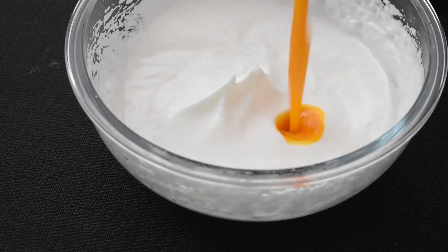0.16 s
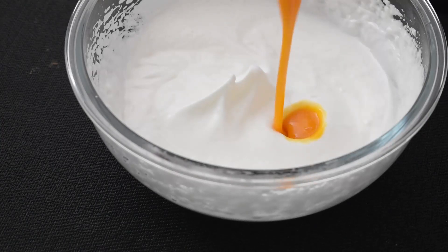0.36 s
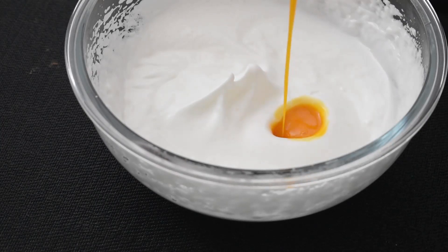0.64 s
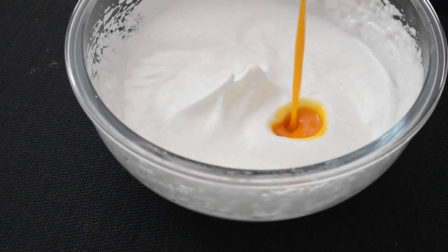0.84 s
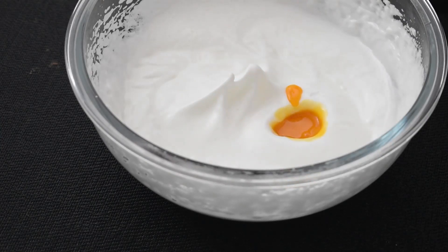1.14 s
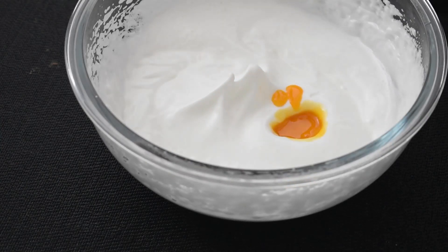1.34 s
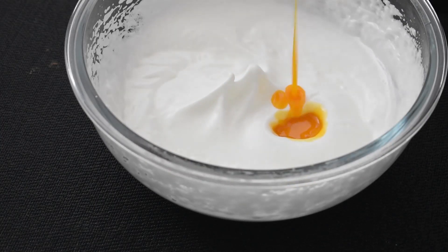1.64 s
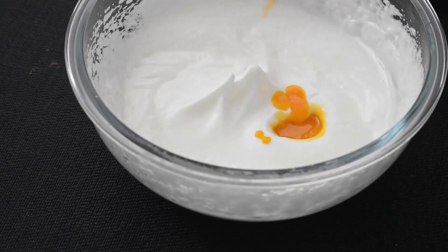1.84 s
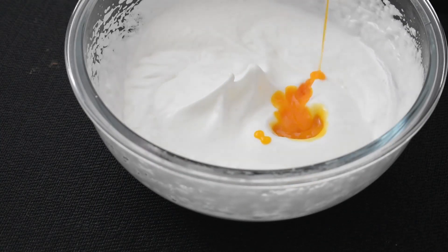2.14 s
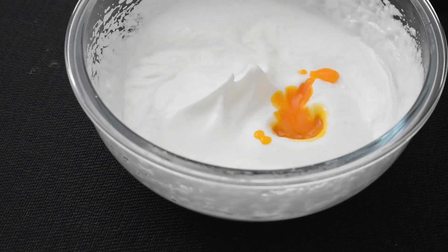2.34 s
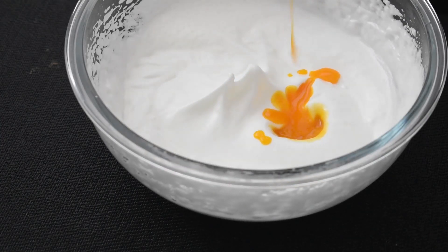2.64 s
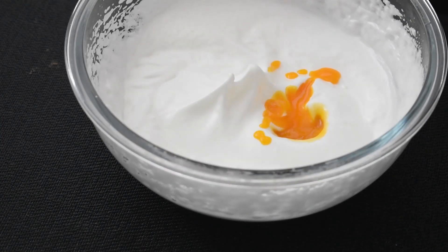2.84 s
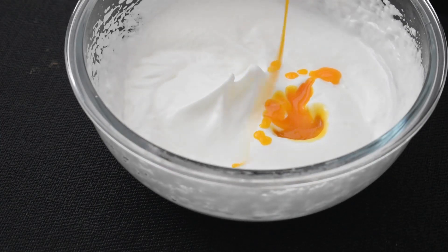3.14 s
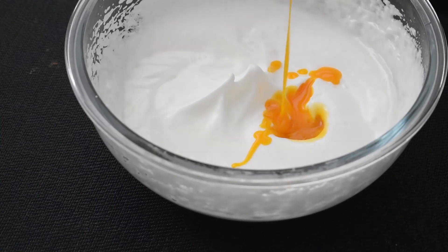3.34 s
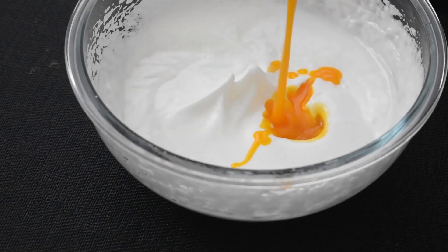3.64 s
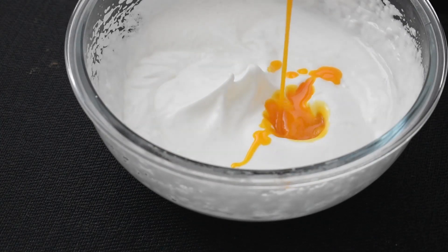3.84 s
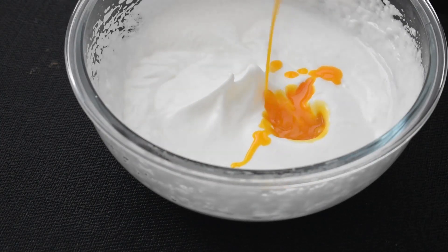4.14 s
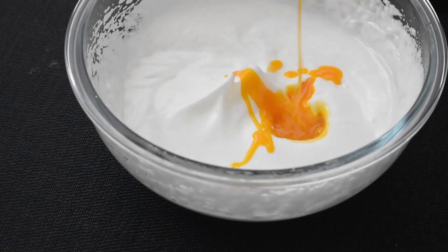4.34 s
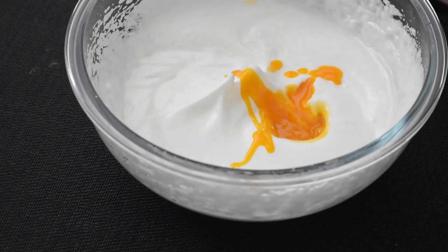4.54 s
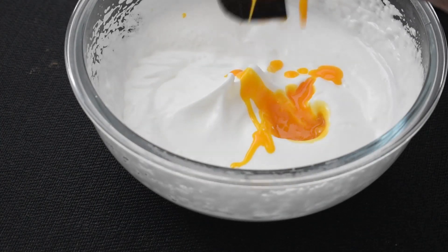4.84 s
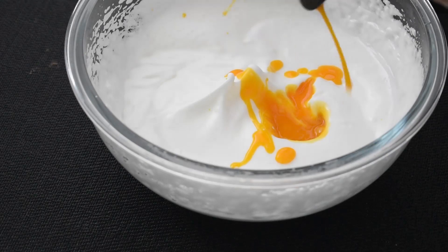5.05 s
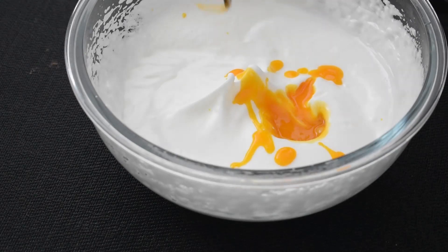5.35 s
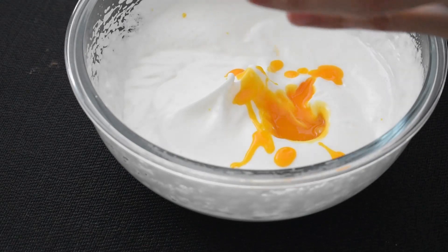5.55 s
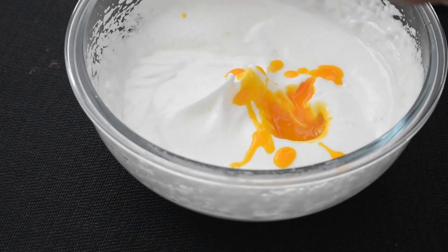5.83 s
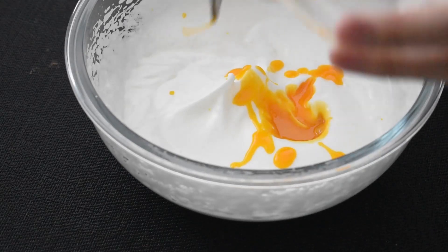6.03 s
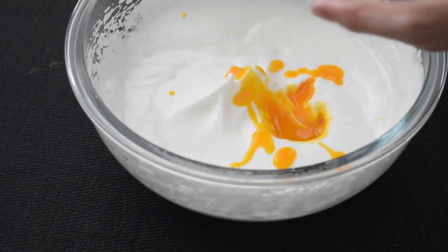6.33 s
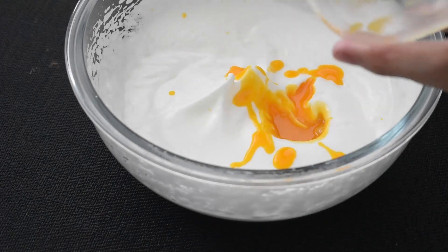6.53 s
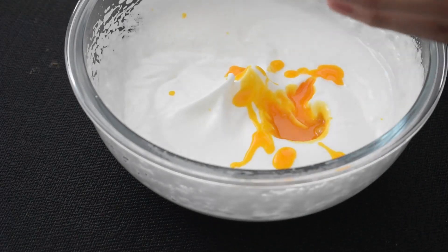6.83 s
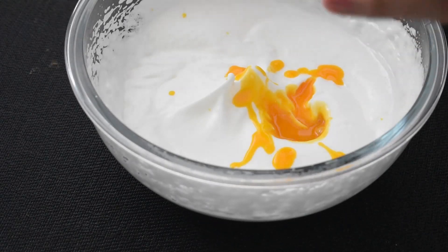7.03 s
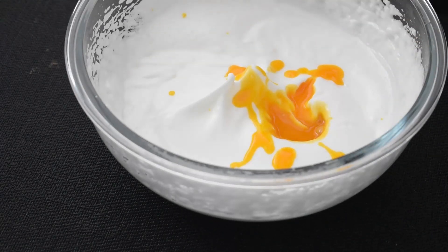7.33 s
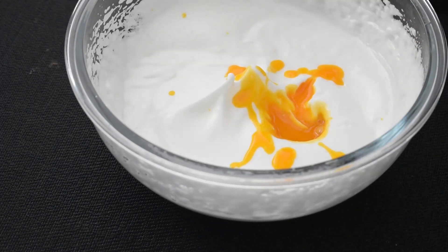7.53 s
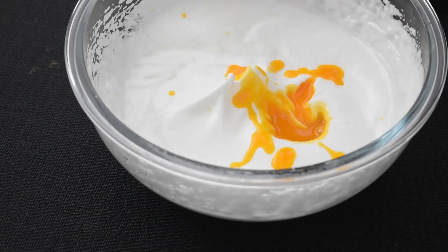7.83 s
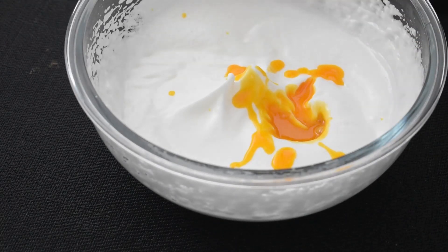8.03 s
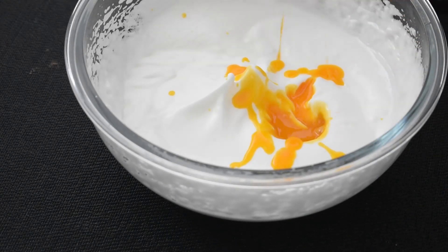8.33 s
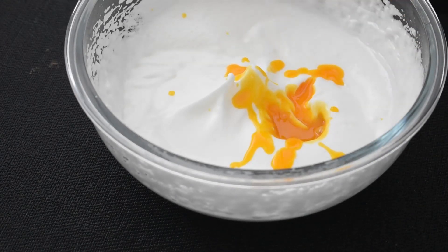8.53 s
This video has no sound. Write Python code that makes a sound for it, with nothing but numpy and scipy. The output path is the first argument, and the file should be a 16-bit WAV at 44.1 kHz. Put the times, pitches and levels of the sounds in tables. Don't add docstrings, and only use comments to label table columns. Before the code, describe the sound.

A spoon scrapes egg yolk from a small glass dish in a quiet kitchen, taps sharply on its rim, then the dish is set down.

```python
import sys
import numpy as np
from scipy import signal
from scipy.io import wavfile
from scipy.ndimage import uniform_filter1d

SR = 44100
rng = np.random.default_rng(int(sys.argv[2]) if len(sys.argv) > 2 else 0)


def invert_db(x):
    u = np.asarray(x, float) / 20
    return 10 ** u


def store_pcm(level_fs):
    pcm = np.round(np.clip(level_fs, -1, 1) * 32767).astype(np.int16)
    wavfile.write(sys.argv[1], SR, np.atleast_2d(pcm).T)


N = 382788

# f/Hz, level/dB, unsteadiness/0-1
HUM = [(60, -65.5, .4), (120, -63.5, .5)]
# f/Hz, density/dB per Hz
FLOOR = [(8.8, -23.5), (15, 7), (33, -14.5), (62, -13.5), (240, -21.5), (748, -29.5), (2780, -36.5),
         (15500, -40)]
# f/Hz, level/dB
APART = [(60, -27), (110, -21), (200, -17.5), (700, -13), (2380, -8), (4400, -5.5), (15000, -2.5)]
# t/s, level/dB
STIR = [(0.0, -57), (5.2, -56.5), (7.3, -57.5), (8.68, -58)]
# f/Hz, t60/s
ROOM = [(250, 0.4), (550, 0.27), (1000, 0.42), (3000, 0.39), (5000, 0.43), (10000, 0.44), (15000, 0.21)]
# delay/s, level/dB
WALLS = [(.005, -14.5), (.027, -18.5), (.036, -15), (.06, -17.5)]

# peak t/s, rise/s, fall/s, level/dB, worktop note f/Hz
BUMPS = [
    (.096, 0.028, 0.064, -49, 218),
    (.18, 0.023, .13, -46, 205),
    (.17, .02, .06, -53, 310),
    (.6, 0.051, .2, -55, 208),
    (1.99, 0.037, .12, -49, 214),
    (3.8, .3, 0.072, -55, 333),
    (4.27, .03, 0.058, -51, 306),
    (4.306, .03, .1, -48, 212),
    (5.28, .04, 0.079, -44.5, 212),
]
# peak t/s, rise/s, fall/s, level/dB
SLIDES = [
    (1.37, .2, .06, -64),
    (1.54, 0.023, 0.44, -59.5),
    (1.97, 0.15, 0.035, -62),
    (2.59, 0.15, 0.073, -55.5),
    (2.934, .006, 0.072, -53),
    (5.926, .08, .04, -59),
    (5.994, .03, .025, -63),
    (7.192, .006, 0.051, -56.5),
]
# peak t/s, rise/s, fall/s, level/dB
RATTLES = [
    (4.157, 0.023, .004, -41),
    (4.503, 0.014, 0.0049, -42),
    (5.72, .2, .15, -64.5),
    (5.93, .05, .05, -61),
    (6.518, .005, 0.054, -50),
]
# t/s, peak level/dB, centre f/Hz
TICKS = [
    (0.156, -47, 8550),
    (0.5606, -37, 8700),
    (3.7993, -41, 12700),
]
# t/s, peak level/dB, body f/Hz, brightness/dB, room share/dB
KNOCKS = [(0.634, -44, 810, -17, -9), (1.891, -45.5, 397, -11, -2.5), (2.208, -53, 1150, -13, -13),
          (2.454, -39, 397, -18, -7), (2.619, -45, 864, -15, -20), (2.708, -57, 476, 4, -3),
          (3.112, -28.5, 417, -12, -6.5), (3.826, -41, 615, -12, -7), (4.05, -49, 950, 1.5, -5),
          (4.296, -56, 1130, -10, -37), (4.384, -41, 686, -25, -10.5), (4.76, -39, 430, -19, -18.5),
          (5.147, -39.5, 560, -16, -10), (5.261, -46, 474, -12.5, -16), (5.62, -42, 688, -21, -4.5),
          (6.805, -35.5, 616, -11, -7.5)]

# t/s, upper-mode peak/dB, low modes/dB, top modes/dB, room
# share/dB
TAPS = [
    (4.1661, -25, 3, -6, -4.5),
    (4.5058, -23.5, 3.5, 1, -6),
    (4.5107, -16, 1, -8.5, -6),
    (5.7368, -52.5, 3, -12, 2),
    (6.8281, -45.5, 3, -3, 2),
    (6.8684, -30.5, 2.5, 1, -6),
        (4.1598, -28, 5.5, -2.5, -8.5),
    (4.81, -54.5, -3.5, 2.5, -9.5),
]
HELD_TAPS = [
    (0.087, -48.5, 1.5, -12, -10),
    (0.1314, -60, 0, 9, -6),
    (0.5651, -42.5, 4.5, 5, -9.5),
    (2.1316, -54, -3, 1, -2),
    (2.5885, -55, 5, -3, -8),
    (2.7736, -48, -4, -12, -10),
    (2.9154, -47, -1, 3.5, -6),
    (4.2894, -49, 7.5, -8, -9),
    (7.1452, -46, -0.5, -5, 1),
    (7.1683, -44.5, -14, 6, -5),
]
CLINKS = [
    (3.0824, -55.5, 10, -3, 2),
    (3.6549, -42.5, 5.5, -6, -7.5),
    (5.6213, -55, 1.5, -12, 0),
    (5.9174, -69, -3, -3, -12),
    (6.8064, -40.5, -9, -13, 2.5),
]
DIGS = [
    (1.487, -44.5, -2.5, -1, 0),
    (1.8855, -49, 4.5, 3, -4),
    (1.9785, -49.5, -2, -7, -4),
    (2.455, -46, 7.5, -12, -5),
    (2.82, -31.5, -1, 0.5, -4),
    (3.1118, -30, -3, -5, -5.5),
]

# f/Hz, level/dB, t60/s
DISH_LOW = [(390, -8.5, .025), (795, -1.5, 0.01), (910, -0.5, 0.019), (1130, 5.5, 0.014), (1440, 1, 0.012),
            (1810, -9, 0.0101), (2320, -6, 0.0033), (1122, -23, .27)]
DISH_UPPER = [(2965, -2, 0.02), (3293, 1.5, 0.0098), (3695, -3, 0.00855), (3297, -16.5, 0.22)]
DISH_TOP = [(4542, -4.5, 0.017), (4748, -5, 0.022), (5220, -12.5, .01), (6000, -12, 0.0058)]
# f/Hz, level/dB, t60/s
EDGE = [(7100, 4, 0.0032), (8006, -0.5, 0.0028), (10620, 0, 0.0031), (13070, -4, 0.0062)]
# f/Hz, level/dB, t60/s
SPOON_LOW = [(1950, -5, 0.017), (2220, -0.5, 0.0068), (1130, -9.5, 0.013), (1950, -24, 0.11)]
SPOON_UPPER = [(2830, 10, .01), (3240, 16, 0.02), (3750, -12, 0.0073), (3230, -38, 0.3)]
# f/Hz, level/dB, t60/s
DIG_LOW = [(416, -3.5, 0.024), (994, 1.5, 0.0079), (1315, 6.5, 0.011), (1690, -6, 0.029)]
DIG_UPPER = [(2470, -0.5, 0.0081), (2870, -2, 0.011), (3310, -2, 0.0051)]
DIG_TOP = [(4450, -4, .006), (4850, -3, .007), (5250, -3, .006)]
# f/Hz, width/Hz, level/dB
DISH_FAR = [
    [(560, 400, -12.5), (1110, 170, -3), (1300, 550, -10.5), (1935, 180, -17)],
    [(3270, 350, -2.5), (3330, 900, -12), (2750, 3000, -18)],
    [(4780, 820, -7), (6500, 3500, -26)],
]
DIG_FAR = [
    [(440, 250, -5), (800, 220, -5), (1300, 530, -2)],
    [(3020, 2400, -8.5)],
    [(4950, 700, -2.5), (7000, 2000, -19)],
]

# t/s, peak level/dB, room share/dB
SET_DOWN = (6.343, -3.16, -6.5)
# f/Hz, width/Hz, level/dB
SET_DOWN_MODES = [(658, 100, 3.5), (977, 380, 6), (1470, 21, -3), (1880, 250, -11), (2790, 260, -5),
                  (4000, 68, -19), (4540, 350, -20), (6760, 100, -32), (8150, 83, -34)]
SET_DOWN_FAR = [(377, 230, -18), (620, 330, -3.5), (1090, 360, -0.1), (1870, 460, -13.5), (2830, 1000, -12),
                (5000, 1100, -26)]
# t/s, peak level/dB, room share/dB
CRACK = (4.8471, 2.5, -6.5)
# f/Hz, width/Hz, level/dB
CRACK_MODES = [(840, 140, -17), (1132, 200, -15), (1475, 200, -18), (3250, 300, -12), (3613, 300, -4.5),
               (4746, 330, 0.8), (6580, 260, -14), (8070, 310, -17), (8950, 120, -26), (10170, 420, -22),
               (10530, 600, -13.5), (11020, 300, -27.5), (12150, 590, -25.5)]
CRACK_FAR = [(600, 540, -26.5), (1106, 88, -6.5), (1295, 310, -13.5), (2000, 900, -30), (3250, 550, -4.5),
             (3888, 840, -10), (4830, 950, -2.5), (7408, 6030, -21.5)]


def evened(x):
    return x / np.sqrt(np.mean(x ** 2) + 1e-20)


def read(points, hz):
    f, value = np.transpose(points)
    return np.interp(np.log(hz + 1), np.log(f + 1), value)


def add(mix, start_s, sound):
    part = mix[round(start_s * SR):][:len(sound)]
    part += sound[:len(part)]


def band(x, lo_hz, hi_hz):
    return signal.sosfilt(signal.butter(2, [lo_hz, hi_hz], "band", fs=SR, output="sos"), x)


def hum():
    t = np.arange(N) / SR
    wander = evened(band(rng.standard_normal((len(HUM), N)), 0.22, 4.4))
    out = np.zeros(N)
    for (hz, db, unsteady), w in zip(HUM, wander):
        out += invert_db(db) * (1 + unsteady * w) * np.sin(2 * np.pi * hz * t) * np.sqrt(2)
    return out


def floor():
    frames, hz = N // 512 + 6, np.fft.rfftfreq(2048, 1 / SR)
    a, b, c, d, patches = rng.standard_normal((frames, 1025, 5)).T
    patches = uniform_filter1d(patches, 14, 0)
    patches = evened(uniform_filter1d(patches, 8, 1))
    s, air_db = np.transpose(STIR)
    stir_db = np.interp(np.arange(frames) * 512 / SR, s, air_db - air_db[-1])
    stirred = 1 / (1 + (hz[:, None] / 2400) ** 2)
    mid_db = read(FLOOR, hz)[:, None] + 0.78 * patches + 1.1 * stirred * stir_db
    side_db = (read(FLOOR, hz) + read(APART, hz))[:, None]
    mid = (a + 1j * b) * invert_db(mid_db)
    side = (c + 1j * d) * invert_db(side_db)
    air = signal.istft(np.array([mid + side, mid - side]), nperseg=2048, noverlap=1536)[1][:, :N]
    return invert_db(-49) * evened(air)


def kitchen(x):
    hz, t, z = signal.stft(rng.standard_normal(SR), SR, nperseg=256)
    decay = invert_db(-60 * t / read(ROOM, hz)[:, None])
    tail = signal.istft(z * decay, SR, nperseg=256)[1][:SR]
    t = np.arange(SR) / SR
    tail = tail * (1 - np.exp(-(t / 0.011) ** 2))
    tail = tail / np.linalg.norm(tail)
    for delay_s, db in WALLS:
        scatter = rng.standard_normal(400) * np.exp(-t[:400] / 0.002)
        add(tail, delay_s, invert_db(db) * scatter / np.linalg.norm(scatter))
    return signal.fftconvolve(x, tail)[:N]


def stroke(peak_s, rise_s, fall_s, db):
    t = np.arange(-rise_s, fall_s, 1 / SR)
    sunk = np.where(t < 0, -t / rise_s, t / fall_s)
    drop_db = 18
    return peak_s - rise_s, invert_db(db - drop_db * sunk) * np.minimum(8 * (1 - sunk), 1)


def bumps():
    shiver = evened(band(rng.standard_normal((2, N)), 2.4, 40))
    quarter_turn = np.array([[0], [1 / 4]])
    out = np.zeros(N)
    for *shape, hz in BUMPS:
        start_s, swell = stroke(*shape)
        at = round(start_s * SR) + np.arange(len(swell))
        tones = np.cos(2 * np.pi * (hz * at / SR + quarter_turn))
        murmur = ((0.68 + 0.39 * shiver[:, at]) * tones).sum(0)
        add(out, start_s, swell * murmur)
    return invert_db(-2.5) * out


def ring(modes, stray, rise_s=0.00047, chatter_s=0.00059):
    t = np.arange(SR // 3) / SR
    hz, db, t60 = np.transpose(modes)[:, :, None]
    luck = rng.uniform(-1.1, 1, (len(modes), 2))
    hz = hz * (1 + stray * luck[:, :1] * (t60 < 0.1))
    level = invert_db(db + 60 * stray * luck[:, 1:] - 60 * t / t60)
    x = (level * np.sin(2 * np.pi * hz * t)).sum(0)
    contact = 0.22 * rng.standard_normal(256) * np.exp(-t[:256] / chatter_s)
    contact[0] = 1
    x = signal.oaconvolve(x * (1 - np.exp(-t / rise_s)), contact)
    return x / abs(x).max()


def slips(rows, body):
    size = invert_db(4.6 * np.minimum(rng.exponential(1, N), 5)) * rng.choice([-1, 1], N)
    slipped = rng.random(N) < 900 / SR
    pressure = np.zeros(N)
    for row in rows:
        add(pressure, *stroke(*row))
    return evened(signal.oaconvolve(size * slipped, body)[:N]) * pressure


def slides():
    edge = ring(DIG_TOP, 0) + invert_db(3.5) * ring(DIG_UPPER, 0) + invert_db(-7.5) * ring(DIG_LOW, 0)
    dish = ring(DISH_UPPER, 0) + invert_db(-2) * ring(DISH_TOP, 0) + invert_db(-4.5) * ring(DISH_LOW, 0)
    return invert_db(-3.5) * slips(SLIDES, edge) + slips(RATTLES, dish)


def ticks():
    out = []
    for s, db, hz in TICKS:
        film = [(hz, 0, 0.0018), (hz * 0.92, 0, 0.002), (hz * 1.2, 0, 0.0015)]
        tick = invert_db(db + 4) * ring(film, 0.02, 0.0001)
        out.append((s, tick, invert_db(-4) * tick))
    return out


def knocks():
    snap_modes = [(2252, 1.5, 0.0014), (3150, -1.5, 0.0026), (4500, -7.5, 0.004)]
    out = []
    for s, db, hz, bright_db, wet_db in KNOCKS:
        body = ring([(hz, 0, 0.012), (150, -6, 0.025), (hz * 1.7, -8, 0.007),
                     (hz * 1.336, -2.5, 0.012), (hz * 1.92, -4, 0.008)], 0.024)
        snap = ring(snap_modes, 0.028, 0.0001)
        knock = -invert_db(db + 7) * (body + invert_db(bright_db) * snap)
        out.append((s, knock, invert_db(wet_db) * knock))
    return out


def burst(humps, like):
    f = abs(np.fft.fftfreq(2048, 1 / SR))
    power = sum((invert_db(db) / (1 + (2 * (f - hz) / width) ** 2)) ** 2 for hz, width, db in humps)
    gain = np.sqrt(power) * f ** 2 / (f ** 2 + 150.0 ** 2)
    minimum_phase = np.exp(np.conj(signal.hilbert(np.log(gain + 1e-5))))
    x = np.fft.ifft(minimum_phase).real[:1024]
    return x * np.linalg.norm(like) / np.linalg.norm(x)


def taps(rows, groups, edge_db, far=None):
    low_modes, upper_modes, top_modes = groups
    out = []
    for s, db, low_db, top_db, wet_db in rows:
        upper = ring(upper_modes, 0.01)
        low = ring(low_modes, 0.034)
        top = ring(top_modes, 0.017) + invert_db(edge_db) * ring(EDGE, 0.036, 0.0001)
        sound = invert_db(db + 3) * (upper + invert_db(low_db) * low + invert_db(top_db) * top)
        thrown = sound
        if far:
            humps = []
            for group, share_db in zip(far, (low_db, 0, top_db)):
                humps += [(hz, width, own_db + share_db) for hz, width, own_db in group]
            thrown = burst(humps, sound)
        out.append((s, sound, invert_db(wet_db) * thrown))
    return out


def all_taps():
    held_low, held_upper = DISH_LOW[:-1], DISH_UPPER[:-1]
    out = taps(TAPS, (DISH_LOW, DISH_UPPER, DISH_TOP), -11.5, DISH_FAR)
    out += taps(HELD_TAPS, (held_low, held_upper, DISH_TOP), -3.5, DISH_FAR)
    out += taps(CLINKS, (SPOON_LOW, SPOON_UPPER, DISH_TOP), -9)
    out += taps(DIGS, (DIG_LOW, DIG_UPPER, DIG_TOP), -9, DIG_FAR)
    return out


def lasting(peaks, longer):
    return [(hz, db + 20 * np.log10(width), longer * 2.84 / width) for hz, width, db in peaks]


def set_down():
    s, db, wet_db = SET_DOWN
    worktop = [(11150, 2500, -32.5), (182, 160, -18), (5550, 1500, -30)]
    modes = lasting(SET_DOWN_MODES + worktop, 0.7)
    sound = invert_db(db) * ring(modes, 0, 0.00053, chatter_s=0.00052)
    return s, sound, invert_db(wet_db) * burst(SET_DOWN_FAR, sound)


def crack():
    s, db, wet_db = CRACK
    free_ring = [(250, -28, 0.02), (14470, -19.5, 0.0023), (3240, -16.5, 0.4), (1115, -20, 0.26),
                 (3620, -21, 0.3), (4797, -14.5, 0.3), (5500, -21.5, 0.3)]
    sound = invert_db(db) * ring(lasting(CRACK_MODES, 1.5), 0, 0.00025, chatter_s=0.00093)
    add(sound, 0.0022, invert_db(-7.5) * ring(lasting(CRACK_MODES, 2.1), 0))
    add(sound, 0, invert_db(-9) * ring(EDGE + free_ring, 0, 0.0001))
    sound = band(sound, 600, 19000) + invert_db(-14) * sound
    return s, sound, invert_db(wet_db) * burst(CRACK_FAR, sound)


def blows():
    near, sent = np.zeros((2, N))
    for s, sound, thrown in ticks() + knocks() + all_taps() + [set_down(), crack()]:
        add(near, s, sound)
        add(sent, s, thrown)
    return near, sent


def scene():
    near, sent = blows()
    rub = slides()
    objects = band(near + rub + kitchen(sent + invert_db(-6) * rub), 84.3, 19000)
    return objects + bumps() + floor() + hum()


def roll_off(x):
    return signal.sosfilt(signal.butter(12, 15650, fs=SR, output="sos"), x)


def record(dry):
    lowpass = signal.firwin(255, 16300, window=("kaiser", 8), fs=SR)[None]
    mix = signal.oaconvolve(np.clip(dry, -1.3, 1.3), lowpass, "same")
    return roll_off(mix)


dry = scene()
out = record(dry)
store_pcm(out)
```